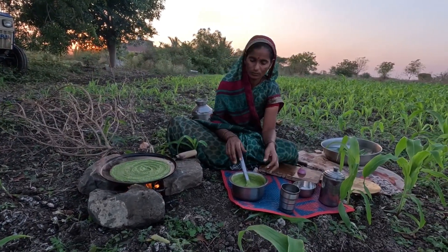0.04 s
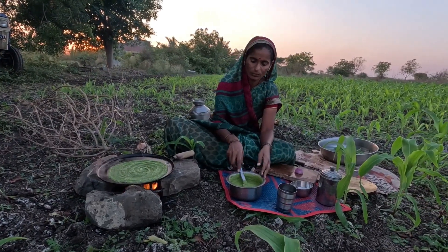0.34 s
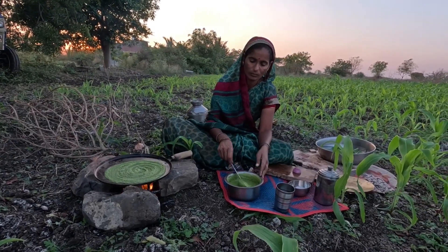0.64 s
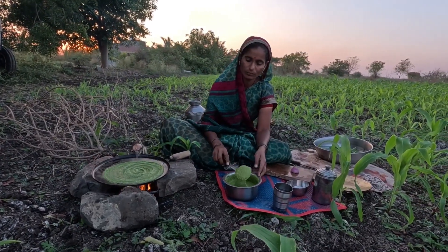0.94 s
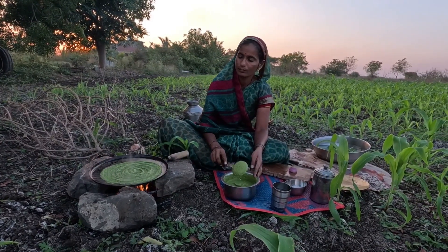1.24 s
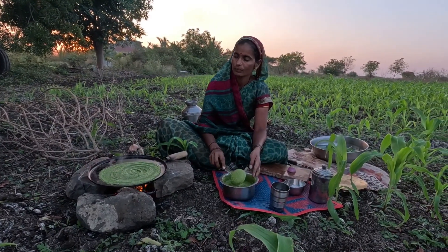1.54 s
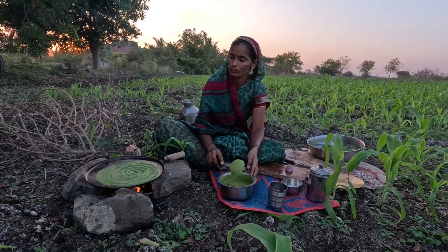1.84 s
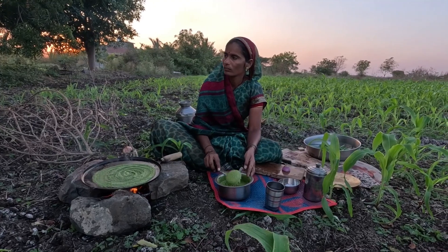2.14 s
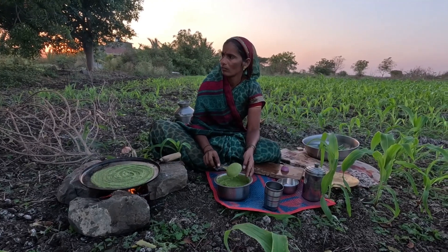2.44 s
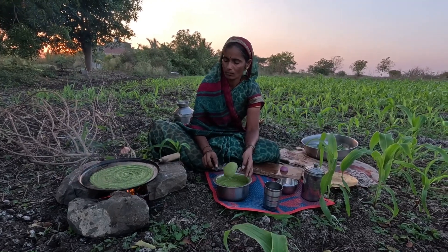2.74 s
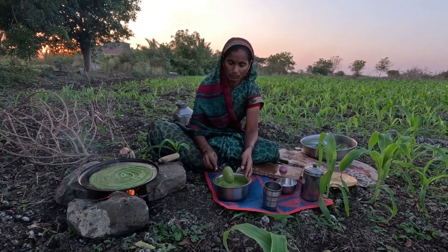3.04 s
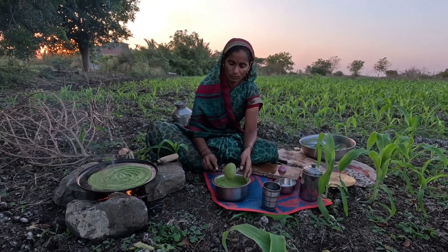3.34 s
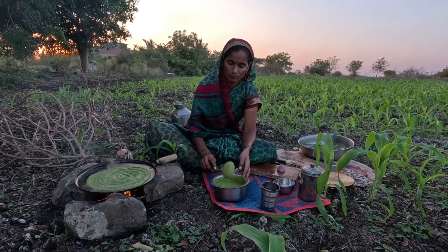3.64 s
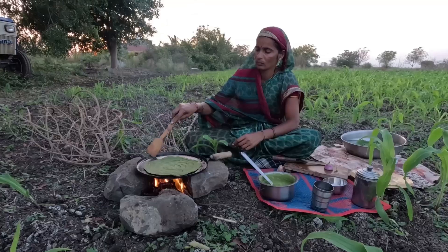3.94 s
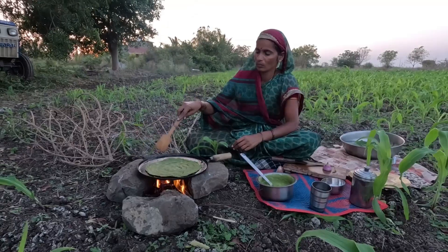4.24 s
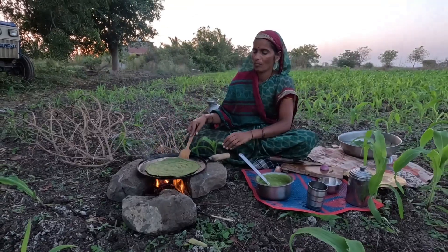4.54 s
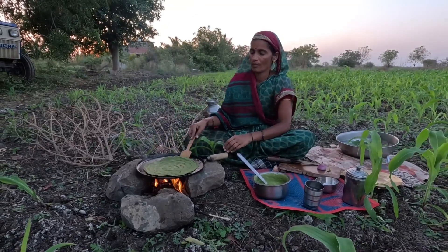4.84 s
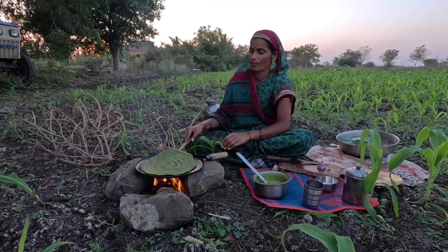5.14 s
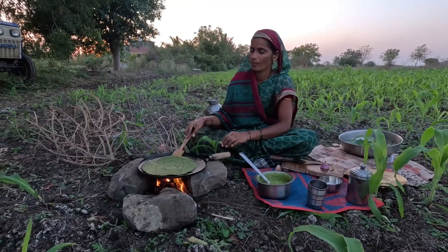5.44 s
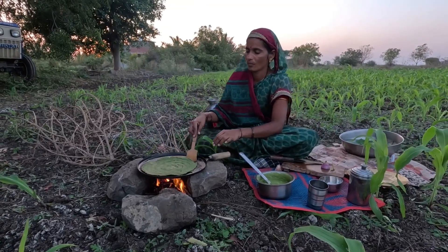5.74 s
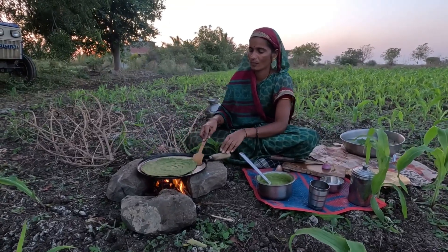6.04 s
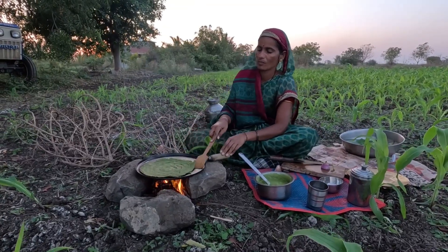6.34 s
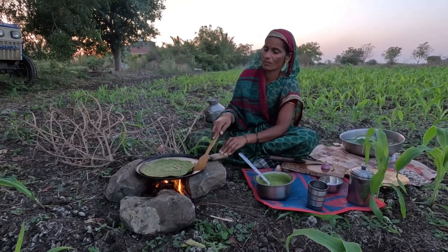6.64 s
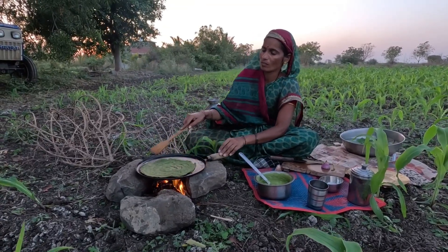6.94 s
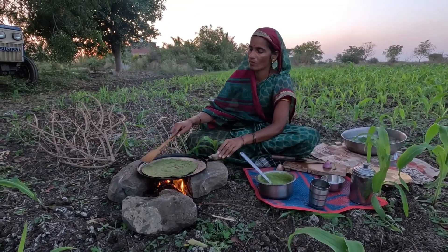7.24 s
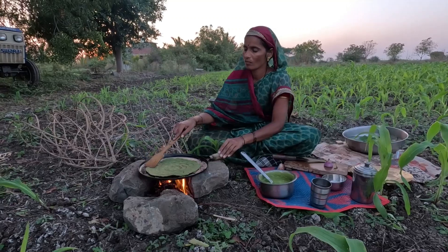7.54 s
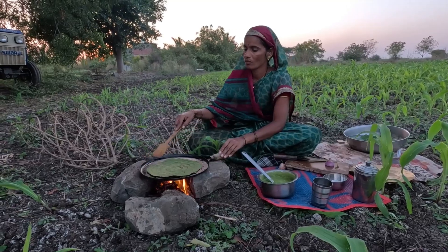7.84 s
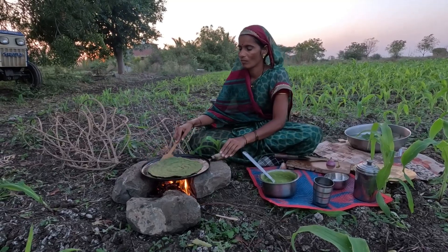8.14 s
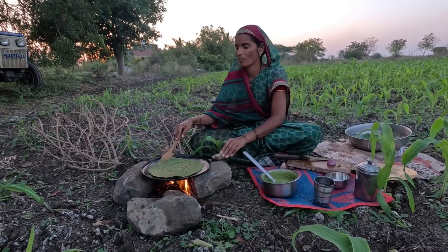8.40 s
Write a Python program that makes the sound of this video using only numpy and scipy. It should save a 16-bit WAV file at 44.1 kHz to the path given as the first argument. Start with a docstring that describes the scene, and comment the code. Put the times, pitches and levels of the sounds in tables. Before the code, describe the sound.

A ladle knocks quickly on a steel pot over evening crickets, then a wooden spatula faintly taps and scrapes an iron griddle.

```python
"""Cooking at a field's edge, dusk.

Crickets chirp over a far chorus, birds and a low rumble while a ladle knocks on the rim of a steel
pot, its ring damped by batter. The field drops out, returns with a tick in the right ear and fades
in slowly. A wooden spatula then taps and scrapes round an iron griddle, making it ring and hum."""
import sys
import numpy as np
from scipy import signal
from scipy.fft import rfft, irfft, next_fast_len
from scipy.io import wavfile

SR = 44100
rng = np.random.default_rng(int(sys.argv[2]) if len(sys.argv) > 2 else 0)


def materialize(psi):
    """Save the field psi as 16-bit PCM at rate SR to the path in sys.argv[1].

    A 1-D psi becomes a single channel; in a 2-D psi each row is a channel.
    """
    bounded = np.clip(np.atleast_2d(psi).T, -1, 1)
    quanta = np.round(bounded * 32767).astype(np.int16)
    wavfile.write(sys.argv[1], SR, quanta)


N = 382347
T = np.arange(N) / SR
CUT_S, PAUSE_S, RETURN_S = 3.92, 4.05, 4.26  # field drops out, switches early to late, returns


def from_db(db):
    """Decibels to gain."""
    return np.exp(np.asarray(db) * (np.log(10) / 20))


def unit_rms(x):
    """Scale to unit rms."""
    return x / np.sqrt(np.mean(x ** 2) + 1e-20)


def coloured(x, spectrum):
    """Filter by a (frequency [Hz], gain [dB]) curve."""
    hz, db = np.transpose(spectrum)
    size = next_fast_len(N)
    log_hz = np.log(np.arange(size // 2 + 1) * SR / size + 1)
    gain = from_db(np.interp(log_hz, np.log(hz), db, left=-90, right=-90))
    return irfft(rfft(x, size) * gain, size)[..., :N]


def noise(spectrum, correlation):
    """Coloured stereo noise, unit rms."""
    mid, side = coloured(rng.standard_normal((2, N)), spectrum)
    return unit_rms(np.sqrt(1 + correlation) * mid + np.sqrt(1 - correlation) * np.array([side, -side]))


def drift(rate_hz):
    """Random curve, spread near one."""
    knots = rng.standard_normal(4000)
    return np.interp(T * rate_hz, np.arange(len(knots)), knots)


def resonate(x, hz, width_hz):
    """Two passes through one resonance, unit rms."""
    b, a = signal.iirpeak(hz, hz / width_hz, fs=SR)
    return unit_rms(signal.lfilter(b, a, signal.lfilter(b, a, x)))


def band(x, low_hz, high_hz):
    """Gentle band-pass."""
    return signal.sosfilt(signal.butter(2, [low_hz, high_hz], "band", fs=SR, output="sos"), x)


def pan(x, left_db):
    """Mono to stereo by level difference."""
    return x * from_db([[left_db / 2], [-left_db / 2]])


def add(out, start_s, sound):
    """Mix a sound in at start_s."""
    at = int(np.clip(round(start_s * SR), 0, N - 1))
    out[..., at:at + sound.shape[-1]] += sound[..., :N - at]


def ringing(t, hz, db, t60_s):
    """Sum of decaying modes, neighbours in opposite phase."""
    modes = from_db(db[:, None] - 60 * t / t60_s[:, None]) * np.sin(2 * np.pi * hz[:, None] * t)
    return (-1) ** np.arange(len(hz)) @ modes


# air spectra before and after the pause: (frequency [Hz], gain [dB])
EARLY_AIR = [(41, -31), (70, -5), (161, -2), (380, -19.5), (828, -21.5), (1480, -10.5), (1860, -15),
             (2540, -11), (3110, -16.5), (3810, -12), (4880, -16), (5710, -11), (6830, -18), (7820, -21),
             (12500, -30.5), (15000, -50)]
LATE_AIR = [(41, -69), (70, -33), (112, -12), (176, -4.5), (380, -17.5), (707, -22), (1300, -15.5),
            (2380, -22), (3330, -22), (6680, -9.5), (7820, -22), (11700, -30), (15000, -42)]

def air(early_db=-57, late_db=-61, early_dip_db=-7, late_dip_db=-9):
    """Hush of open fields, weaker in the crickets' band."""
    def hush(spectrum, dip_db):
        notch = [(20, 0), (4800, 0), (5800, dip_db), (7200, dip_db), (8200, 0), (20000, 0)]
        return coloured(noise(spectrum, correlation=0.55), notch)
    early = from_db(early_db) * hush(EARLY_AIR, early_dip_db)
    late = from_db(late_db) * hush(LATE_AIR, late_dip_db)
    return np.where(T < PAUSE_S, early, late) * from_db(0.89 * drift(26))


# rumble spectrum: (frequency [Hz], gain [dB])
RUMBLE_SPECTRUM = [(15, -15), (26, -1.5), (36, 4), (44, -5), (55, -15), (80, -29.5), (140, -46)]

def rumble(early_db=-49.5, late_db=-57, swing_db=1.5, swell_db=11, swell_s=0.25, half_width_s=0.16):
    """Deep, uneven rumble; swells once, weaker after the pause."""
    swell = np.exp(-((T - swell_s) / half_width_s) ** 2)
    db = np.where(T < PAUSE_S, early_db, late_db) + swell_db * swell + swing_db * drift(9)
    return from_db(db) * noise(RUMBLE_SPECTRUM, correlation=0.87)


def cricket(bouts, period_s, level_db, gap_s, stroke_s, sag_hz, vary_db):
    """Two wing strokes per chirp; level and pitch arch with wing speed."""
    out = np.zeros(N)
    for first_s, last_s, hz in bouts:
        for chirp_s in np.linspace(first_s, last_s, round((last_s - first_s) / period_s) + 1):
            for delay_s, length_s in ((0, stroke_s), (gap_s, stroke_s * 1.2)):
                u = np.linspace(-1, 1, int(length_s * SR))
                level_jitter, pitch_jitter = rng.standard_normal(2)
                wing_hz = hz + 10 * pitch_jitter - sag_hz * (u + 0.08) ** 2
                stroke = np.cos(u * np.pi / 2) ** 2 * np.sin(2 * np.pi * np.cumsum(wing_hz) / SR)
                gain = from_db(level_db + vary_db * level_jitter)
                add(out, chirp_s + delay_s - length_s / 2, gain * stroke)
    return out


# cricket bouts: (first chirp [s], last chirp [s], pitch [Hz])
NEAR_BOUTS = [(.326, 2.92, 5850), (3.66, 3.855, 5850), (4.4, 5.637, 5750), (6.498, 8.56, 5750)]
FAR_BOUTS = [(.11, 3.83, 7090), (4.37, 8.565, 6830)]
# chorus spectrum: (frequency [Hz], gain [dB])
CHORUS_SPECTRUM = [(5400, -33.5), (5800, -4), (6200, -2), (6800, 0.5), (7100, -3), (7350, -9.5),
                   (7700, -24.5)]
# far insect buzzes: (start [s], end [s], level [dB])
BUZZES = [(0.513, 1.01, -61.5), (4.197, 4.556, -69), (6.301, 6.652, -71), (7.281, 7.661, -69.5),
          (8.252, 8.8, -66)]

def insects(early_db=-59, late_db=-57, throb_db=1.84, trill_db=-67, near_step_db=-4, far_step_db=3):
    """Two crickets over a throbbing chorus, a thin trill and a far buzz."""
    late = T > PAUSE_S
    near = cricket(NEAR_BOUTS, period_s=0.203, level_db=-49,
                   gap_s=0.051, stroke_s=0.047, sag_hz=273, vary_db=-0.8)
    far = cricket(FAR_BOUTS, period_s=0.165, level_db=-57,
                  gap_s=0.039, stroke_s=0.04, sag_hz=160, vary_db=2.5)
    crickets = pan(near * from_db(late * near_step_db), 0.96)
    crickets += pan(far * from_db(late * far_step_db), -0.9)
    chorus = noise(CHORUS_SPECTRUM, correlation=0.53)
    chorus *= from_db(np.where(late, late_db, early_db) + throb_db * drift(45))
    trill = resonate(rng.standard_normal(N), hz=6875, width_hz=35) * from_db(trill_db + 2 * drift(5.1))
    swells = sum(from_db(db) * np.sin(np.pi * np.clip((T - start_s) / (end_s - start_s), 0, 1))
                 for start_s, end_s, db in BUZZES)
    tremolo = 1.14 + 0.43 * np.sin(2 * np.pi * 33 * T)
    buzz = swells * tremolo * resonate(rng.standard_normal(N), hz=3870, width_hz=300)
    return crickets + chorus + pan(trill + buzz, 0.3)


# call contour: (time from first crest [s], pitch [Hz])
CALL_CONTOUR = [(-.16, 2250), (0, 2660), (.11, 2490), (.215, 2620), (.33, 2480)]

def calling_bird(first_s=-0.055, period_s=0.528, level_db=-63, vary_db=1.5, detune=0.004, flutter_db=1,
                 under_ratio=0.9, under_db=-7, echo_s=0.052, echo_db=-8):
    """Far double-arched call with a fainter line below and an echo; repeats until the pause."""
    knot_s, knot_hz = np.transpose(CALL_CONTOUR)
    knots = np.arange(len(knot_s))
    t = np.arange(knot_s[0], knot_s[-1], 1 / SR)
    leg = np.interp(t, knot_s, knots)
    eased = np.floor(leg) + np.sin(np.pi / 2 * (leg % 1)) ** 2
    pitch_hz = np.interp(eased, knots, knot_hz)
    envelope = np.sin(np.pi * np.arange(len(t)) / len(t)) ** 0.68
    out = np.zeros(N)
    for crest_s in np.arange(first_s, CUT_S, period_s):
        level_jitter, pitch_jitter = rng.standard_normal(2)
        phase = 2 * np.pi * np.cumsum(pitch_hz * (1 + detune * pitch_jitter)) / SR
        tone = np.sin(phase) + from_db(under_db) * np.sin(under_ratio * phase)
        call = from_db(level_db + vary_db * level_jitter) * envelope * tone
        out += np.interp(T - crest_s, t, call, 0, 0)
        out += from_db(echo_db) * np.interp(T - crest_s - echo_s, t, call, 0, 0)
    return pan(out * from_db(flutter_db * drift(23)), -1)


# single bird notes: (crest time [s], crest pitch [Hz], level [dB])
WHISTLES = [(0.101, 2090, -60.5), (.26, 1564, -62), (0.409, 1564, -60), (.88, 1512, -63),
            (1.419, 1330, -66), (3.18, 1334, -70), (6.96, 2610, -73)]

def bird_whistles(length_s=0.17, sag_share=0.087, flutter_db=3.5):
    """Thin notes of other far birds, arching in pitch."""
    out, u = np.zeros(N), np.linspace(-1, 1, int(length_s * SR))
    for crest_s, hz, db in WHISTLES:
        phase = 2 * np.pi * np.cumsum(hz * (1 - sag_share * u ** 2)) / SR
        add(out, crest_s - length_s / 2, from_db(db) * np.cos(u * np.pi / 2) ** 0.5 * np.sin(phase))
    return pan(out * from_db(flutter_db * drift(34)), -1)


# ladle knocks: (time [s], level [dB], treble [dB], place on rim [0-1])
KNOCKS = [(0.447, -43, 19, 0.1), (0.921, -19.5, -0.5, 0.8), (1.224, -7.5, -13.5, 0.01),
          (1.4435, -.5, -1, 0), (1.6574, 1, -2, 0.04), (1.8632, -0.5, 0, 0), (2.031, -41.5, 10, 1),
          (2.069, -0.5, 1, 0), (2.2713, 0.5, -8.5, 0.01), (2.496, 0.5, -0.5, 0), (2.7085, 1, -1.5, 0.02),
          (2.9227, 1.5, 0.5, 0.07), (3.430, -1, -1, 1), (3.623, 1, -1, 1), (3.8188, 1.5, 0.5, 1)]
# pot and ladle modes: (frequency [Hz], level at place 0 [dB], level at place 1 [dB], t60 [s])
POT_MODES = [(192.8, -19.5, -19.5, 0.013), (250, -1.75, -52, 0.004), (321, -17.5, -27, 0.045),
             (450.8, -24, -20.5, 0.068), (554, -16, -24, 0.036), (650, -50, -33.5, 0.045),
             (807, -29.5, -35.5, 0.055), (1078, -30, -28.5, 0.04), (1210, -22.0, -27, 0.0079),
             (1607, -42, -39, 0.045), (2030, -29.5, -28.5, 0.02), (2950, -31.5, -30, 0.026),
             (3430, -29, -31, 0.02), (3763, -38, -33, 0.055), (4420, -20, -21.5, 0.032),
             (4666, -22.5, -22, 0.031), (5260, -25.5, -29.5, 0.018), (5560, -29, -28.5, 0.026),
             (6375, -23.5, -23.5, 0.023), (7100, -25, -30, 0.021), (7780, -33, -30.5, 0.0048),
             (9030, -31.5, -30.5, 0.022), (9260, -31, -32.5, 0.0098), (10100, -29, -25, 0.021),
             (10920, -28, -21.5, 0.0077), (13088, -43, -35, 0.0063)]

def ladle_knocks(vary_db=1.2, detune=0.008, treble_damping=0.19, crack_db=-25, crack_t60_s=0.028,
                 tail_db=-42, tail_t60_s=0.13, sparkle_db=-50, sparkle_t60_s=0.06,
                 echo_s=0.032, echo_db=-25, mat_db=-34, mat_t60_s=0.043):
    """Batter damps the pot: a short thud under a steel clack. The ground scatters a faint tail."""
    out, t = np.zeros(N), T[:SR // 5]
    hz, place0_db, place1_db, t60_s = np.transpose(POT_MODES)
    treble = np.clip(np.log2(hz / 900) / 2, 0, 1)
    damped_t60_s = t60_s * (1 - treble_damping * treble)
    for time_s, db, treble_db, place in KNOCKS:
        level_jitter, pitch_jitter = rng.standard_normal((2, len(hz)))
        white = rng.standard_normal((4, len(t)))
        mode_db = place0_db + place * (place1_db - place0_db) + treble * treble_db
        mode_db += vary_db * level_jitter
        body = ringing(t, hz * (1 + detune * pitch_jitter), mode_db, damped_t60_s)
        crack = band(white[0], 1500, 13000) * from_db(crack_db + treble_db - 60 * t / crack_t60_s)
        tail = unit_rms(band(white[1], 280, 800)) * from_db(tail_db - 60 * t / tail_t60_s)
        sparkle = band(white[2], 900, 7000) * from_db(sparkle_db + treble_db - 60 * t / sparkle_t60_s)
        # the heavy pot thumps on its mat
        thump = unit_rms(band(white[3], 150, 300)) * from_db(mat_db - 60 * t / mat_t60_s)
        thump *= np.minimum(t / 0.002, 1)
        add(out, time_s, from_db(db) * (body + crack + tail + sparkle + thump))
        add(out, time_s + echo_s, from_db(db + echo_db) * band(body, 200, 800))
    return band(out, 140, 12800)


# port balance: (frequency [Hz], left minus right [dB])
PORT_BALANCE = [(100, -0.8), (350, 0.5), (700, 1.4), (1300, 0), (2400, -4), (3800, -0.5), (7000, 1.5),
                (14000, 5)]
# port phase: (frequency [Hz], left lead [rad])
PORT_PHASE = [(300, 0), (900, -0.26), (1850, -1.1), (2700, -0.15), (7000, -0.79), (11000, -0.45)]

def microphone_ports(x):
    """A close sound reaches the two ports at different level and phase."""
    size = next_fast_len(N)
    hz = np.arange(size // 2 + 1) * SR / size
    balance_db = np.interp(hz, *np.transpose(PORT_BALANCE))
    lead_rad = np.interp(hz, *np.transpose(PORT_PHASE))
    left_gain = from_db(balance_db / 2) * np.exp(0.5j * lead_rad)
    return irfft(rfft(x, size) * np.array([left_gain, 1 / left_gain]), size)[:, :N]


# soft bumps: (time [s], level [dB], band centre [Hz])
BUMPS = [(.625, -58, 420), (4.88, -66, 129.5), (5.089, -66, 111), (5.335, -57, 99), (6.671, -52, 343),
         (6.789, -44, 199)]

def bumps(rise_s=0.0088):
    """Dull thuds of things shifting on the ground."""
    out, t = np.zeros(N), T[:SR // 4]
    envelope = 0.5 * t / rise_s * np.exp(1 - t / rise_s)
    for time_s, db, hz in BUMPS:
        thud = unit_rms(band(rng.standard_normal(len(t)), hz * 0.53, hz * 1.86))
        add(out, time_s, from_db(db) * envelope * thud)
    return out


def field_fade(full_db=-2.5, cut_db_per_s=1202, floor_db=-60, return_db=-23, rise_db_per_s=8.5):
    """Field gain: quick cut, pause, steady rise in decibels."""
    falling_db = np.maximum(full_db - cut_db_per_s * np.maximum(T - CUT_S, 0), floor_db)
    rising_db = np.minimum(return_db + rise_db_per_s * (T - RETURN_S), full_db)
    return from_db(np.where(T < RETURN_S, falling_db, rising_db))


# tick spikes: (time [s], level [dB], rise and decay constant [s])
TICK_SPIKES = [(4.2455, -36, 0.00026), (4.25, -29, 0.00036), (4.256, -15.5, 0.0022), (4.2637, -37, 0.00029)]
# tick spectrum: (frequency [Hz], gain [dB])
TICK_SPECTRUM = [(2300, -54), (3000, -23), (4100, -3.5), (5000, -25), (6000, 2.5), (6900, 4.5), (7800, -8),
                 (11000, -20.5), (16000, -39)]

def tick():
    """Bright tick, milliseconds long, right ear only."""
    envelope = sum(from_db(db) * np.exp(-np.minimum(abs(T - time_s) / tau_s, 50))
                   for time_s, db, tau_s in TICK_SPIKES)
    grain = unit_rms(coloured(rng.standard_normal(N), TICK_SPECTRUM))
    right = band(band(envelope * grain, 2410, 19000), 2400, 19000)
    return np.array([np.zeros(N), right])


# spatula taps: (time [s], level [dB], treble [dB], pressure [0-1])
TAPS = [(4.562, -78.5, 10.5, 0.7), (4.951, -65.5, 14, 0.1), (5.135, -65, 2, 0.03), (5.394, -53, 3.5, 0.05),
        (6.102, -81, 19, 0.7), (6.189, -81.5, 21.5, 0.43), (6.457, -60.5, -3, 0.32), (6.79, -43.5, -22, 1),
        (6.80, -40, -0.5, 0.97), (7.747, -73.5, 26.5, 0.47), (8.026, -38.5, 1, 0.91),
        (8.171, -44.5, 2, 0.66)]
# griddle modes: (frequency [Hz], level touched [dB], level pressed [dB], free t60 [s])
GRIDDLE_MODES = [(262, -34, -16.5, 0.062), (431, -27.5, -2, 0.31), (510, -20, -0.5, 0.13),
                 (564, -3, -13.5, 0.28), (655.4, -3.5, -29, 0.3), (853, -8.5, -1.5, 0.12),
                 (1127, -9.5, -13, 0.14), (1328, -17, -7, 0.3), (1544, -38, -1.5, 0.21),
                 (1998, -3, -19.5, 0.041), (2536, -13, -11.5, 0.14), (2977, -21, -8.5, 0.19),
                 (3337, -1, -14, 0.021), (5080, -40, -6, 0.083), (6600, -18, 1.5, 0.026),
                 (7700, -22, -1, 0.085)]

def spatula_taps(vary_db=3.5, crack_db=2, crack_t60_s=0.041, choke_ratio=0.52):
    """The griddle rings after a light touch; a pressed blade chokes it."""
    out, t = np.zeros(N), T[:SR // 2]
    hz, light_db, pressed_db, t60_s = np.transpose(GRIDDLE_MODES)
    treble = np.clip(np.log2(hz / 800) / 2, 0, 1)
    for time_s, db, treble_db, pressure in TAPS:
        mode_db = light_db + pressure * (pressed_db - light_db) + treble * treble_db
        mode_db += vary_db * rng.standard_normal(len(hz))
        body = ringing(t, hz, mode_db, t60_s * choke_ratio ** pressure)
        crack = band(rng.standard_normal(len(t)), 1700, 6300)
        crack *= from_db(crack_db + treble_db - 60 * t / crack_t60_s)
        add(out, time_s, from_db(db) * (body + crack))
    return out


# strokes: (start [s], peak [s], end [s], rub level [dB], pressure [0-1], rasp over rub [dB])
STROKES = [(4.569, 4.682, 4.84, -86.5, 0.42, 2.5), (5.036, 5.158, 5.26, -74, 0.84, 1.5),
           (5.365, 5.67, 5.77, -75.5, 0.41, 8.5), (5.995, 6.096, 6.17, -69.5, 0.22, -2.5),
           (6.225, 6.33, 6.4, -76, .3, -10), (6.516, 6.685, 6.81, -59, 0.69, -9),
           (6.737, 6.803, 6.87, -51.5, 0.98, -30), (7.562, 7.618, 7.79, -60.5, 0.01, 1),
           (8.008, 8.028, 8.16, -54.5, 0.85, -15), (8.111, 8.167, 8.4, -57, .55, -2),
           (8.435, 8.51, 8.57, -67, 0.17, -3), (8.572, 8.66, 9, -67, 0.26, -5.5)]
# friction spectra: (frequency [Hz], gain [dB])
RUB_SPECTRUM = [(500, -13.5), (900, -11.5), (1400, 1.5), (2200, -2), (3500, -9), (5000, -5.5), (7500, -17),
                (10000, -43)]
HISS_SPECTRUM = [(4000, -6), (6000, -4), (8500, -4), (11000, -12), (14000, -26), (16000, -44)]

def spatula_scrape(slips_per_s=400, smooth_gain=0.84, rough_db=1.5, metal_db=-4, t60_ratio=0.48):
    """Dense tiny slips of wood on iron rub, rasp and hiss, and keep the griddle humming."""
    envelopes = np.zeros((4, N))
    for start_s, peak_s, end_s, db, pressure, rasp_db in STROKES:
        ramp = np.interp(np.arange(start_s, end_s, 1 / SR), [start_s, peak_s, end_s], [0, 1, 0])
        effort = from_db(db) * np.sin(np.pi / 2 * ramp) ** 1.8
        # a gliding blade hisses, a pressed one rings the iron
        ring_db = np.interp(pressure, [0, 1], [-18, 5])
        hiss_db = np.interp(pressure, [0, 1], [8, -8.5])
        add(envelopes, start_s, np.outer(from_db([0, ring_db, rasp_db, hiss_db]), effort))
    impulses = (rng.random(N) < slips_per_s / SR) * rng.standard_normal(N)
    slips = (unit_rms(impulses) + smooth_gain * rng.standard_normal(N)) * from_db(rough_db * drift(120))
    hz, light_db, pressed_db, t60_s = np.transpose(GRIDDLE_MODES)
    response = ringing(T[:SR // 4], hz, (light_db + pressed_db) / 2, t60_s * t60_ratio)
    iron = signal.fftconvolve(slips, response)[:N]
    rub = unit_rms(coloured(slips, RUB_SPECTRUM)) + from_db(metal_db) * unit_rms(band(iron, 1440, 8800))
    ring = unit_rms(band(iron, 234, 870))
    rasp = resonate(slips, hz=3230, width_hz=850)  # blade resonance
    hiss = unit_rms(coloured(slips[::-1], HISS_SPECTRUM))
    return np.sum(envelopes * [rub, ring, rasp, hiss], axis=0)


# wood squeaks: (start [s], length [s], start pitch [Hz], end pitch [Hz], level [dB])
SQUEAKS = [(5.713, 0.038, 3260, 3430, -57.5), (6.723, 0.054, 4530, 5200, -67),
           (8.05, 0.08, 4780, 5400, -60)]

def spatula_squeaks(wobble_share=0.013):
    """The blade briefly sticks and slips fast enough to sing."""
    out = np.zeros(N)
    for start_s, length_s, from_hz, to_hz, db in SQUEAKS:
        u = np.linspace(0, 1, int(length_s * SR))
        hz = (from_hz + (to_hz - from_hz) * u ** 2) * (1 + wobble_share * drift(440)[:len(u)])
        add(out, start_s, from_db(db) * np.sin(np.pi * u) * np.sin(2 * np.pi * np.cumsum(hz) / SR))
    return out


def scene():
    """The field under its fade, the cooking close by."""
    field = field_fade() * (insects() + calling_bird() + bird_whistles() + air() + rumble())
    griddle = pan(spatula_taps() + spatula_scrape() + spatula_squeaks() + bumps(), 1)
    return field + microphone_ports(ladle_knocks()) + griddle + tick()


def record(dry, ceiling=0.33, cutoff_hz=16900):
    """Soft clip, then steep low-pass."""
    lowpass = signal.cheby2(14, 70, cutoff_hz, fs=SR, output="sos")
    return signal.sosfilt(lowpass, ceiling * np.tanh(dry / ceiling))


dry = scene()
out = record(dry)
materialize(out)
```